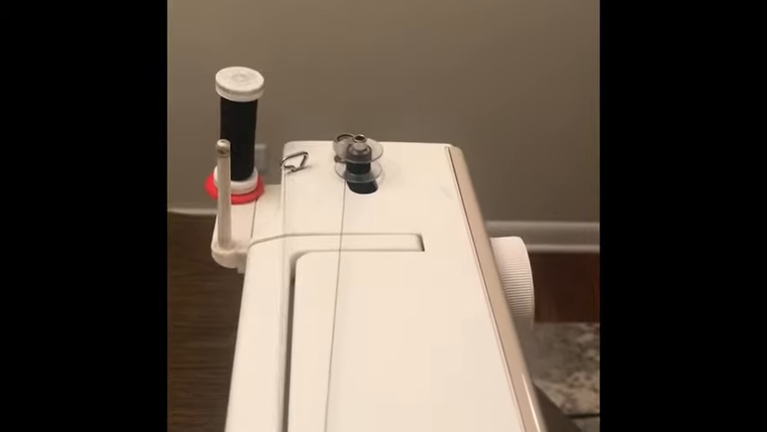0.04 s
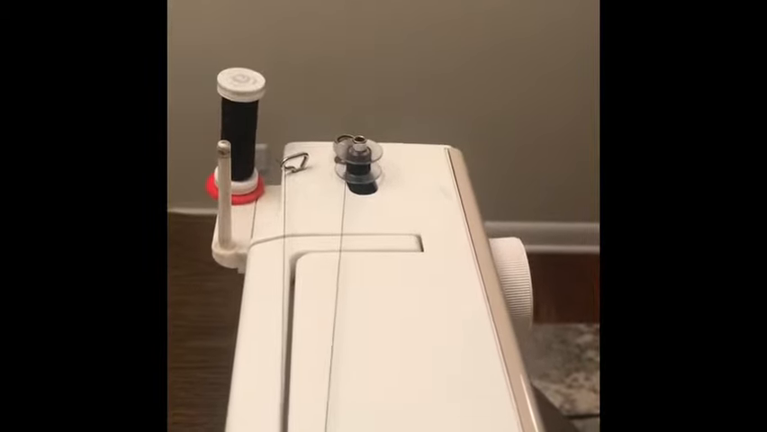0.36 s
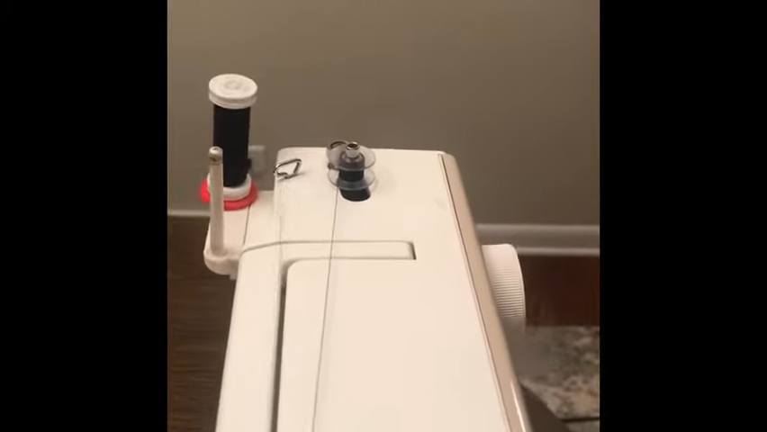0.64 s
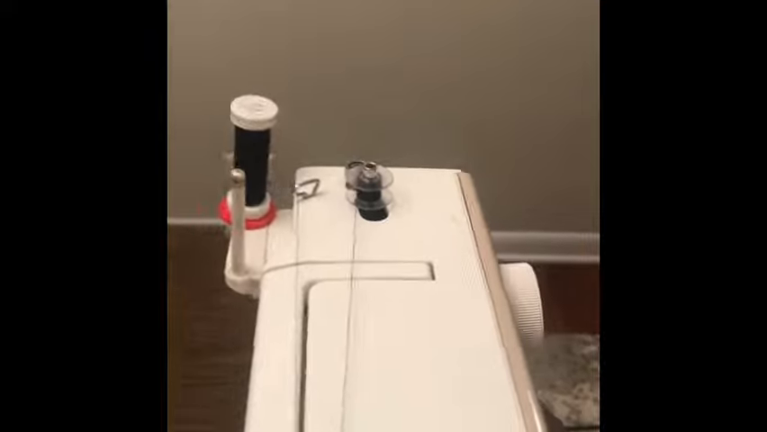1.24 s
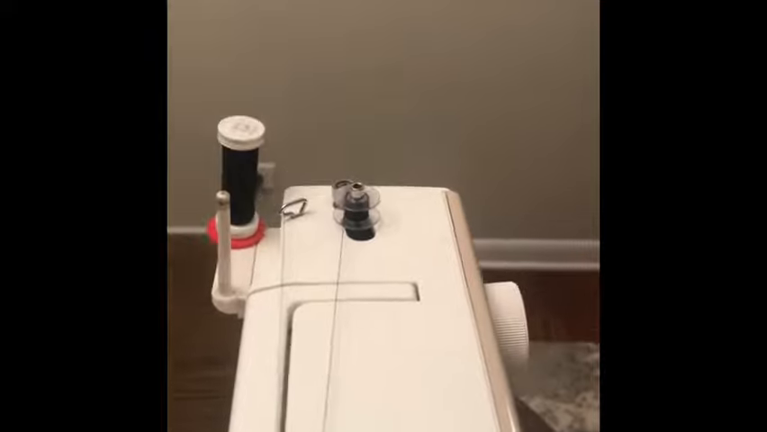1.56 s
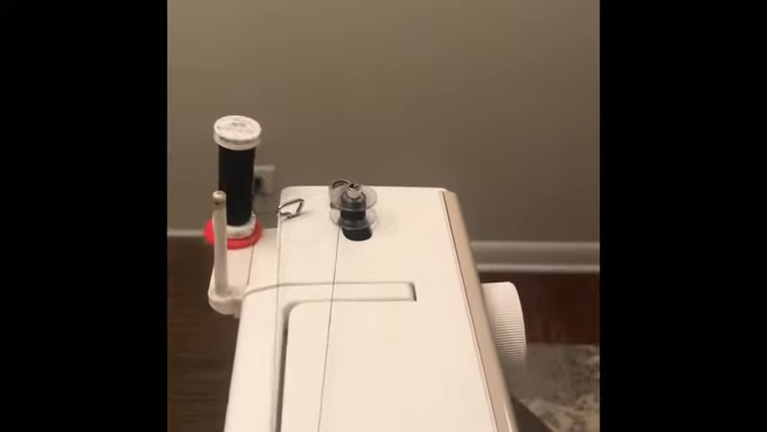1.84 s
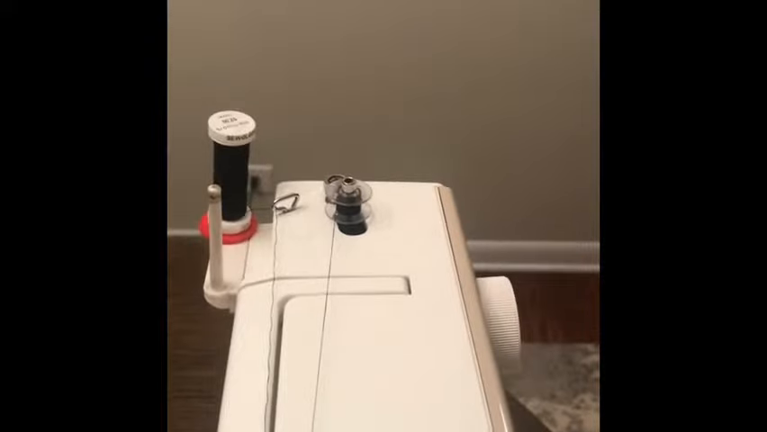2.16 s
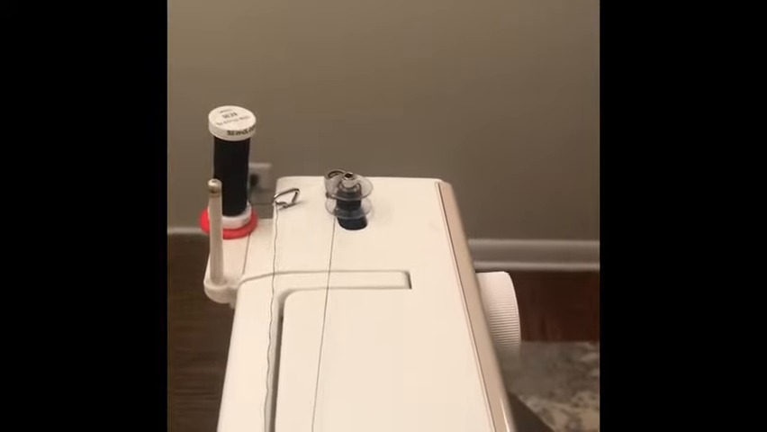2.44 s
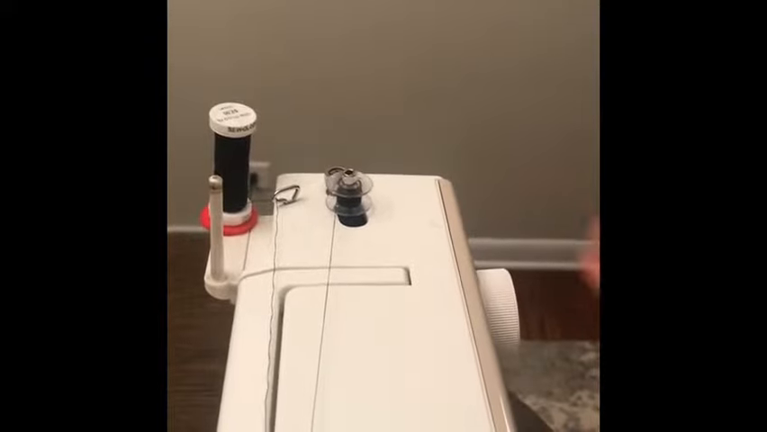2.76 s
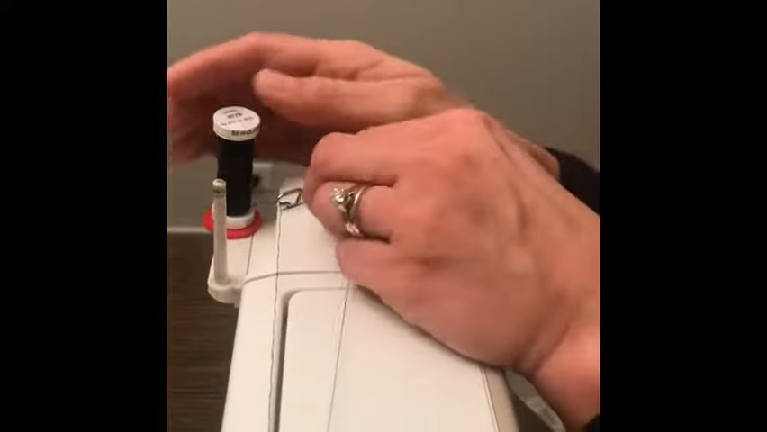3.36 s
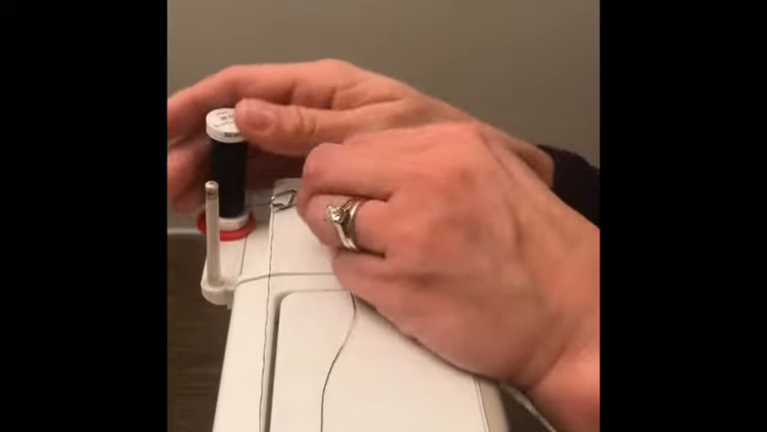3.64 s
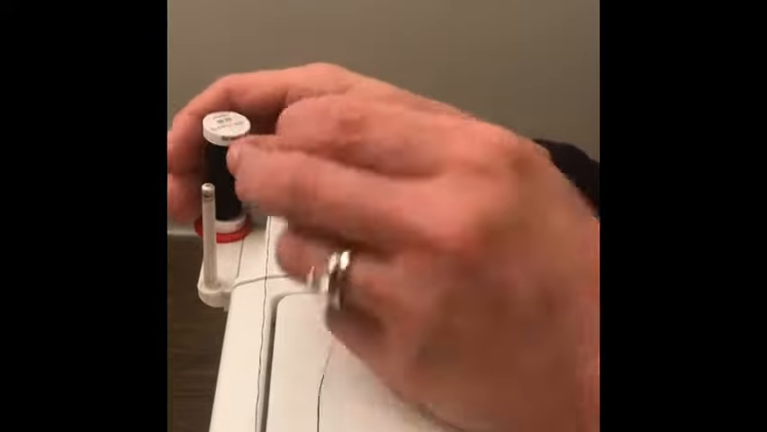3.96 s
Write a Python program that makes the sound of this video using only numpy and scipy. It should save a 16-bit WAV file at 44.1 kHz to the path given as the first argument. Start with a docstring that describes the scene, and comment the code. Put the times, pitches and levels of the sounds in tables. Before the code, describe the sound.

A sewing machine whirs and winds down, followed by light clicks and a sharp plastic snap.

```python
"""A domestic sewing machine winds a bobbin in a small room, over the low rumble of the house.
The drive whirs and rattles in its plastic casing, the motor hums, the thread rasps and ticks
and the spool chatters on its pin. By about 2 s it has run down, and the foot pedal clacks back.
Hands then reach in, brush the casing, snap the winder aside at 3.5 s and handle the bobbin
with light clicks. Last, the thread squeaks through the fingers."""
import sys
import numpy as np
from scipy import signal
from scipy.fft import rfft, irfft
from scipy.io import wavfile
from scipy.ndimage import uniform_filter1d

SR = 44100
rng = np.random.default_rng(int(sys.argv[2]) if len(sys.argv) > 2 else 0)


def generate_wav(signal):
    """Clip the signal to [-1, 1] and save it as 16-bit WAV at the path in sys.argv[1]."""
    frames = np.transpose(np.atleast_2d(signal))
    scaled = np.clip(frames, -1, 1) * 32767
    pcm = np.round(scaled).astype(np.int16)
    wavfile.write(sys.argv[1], SR, pcm)


N = 176400

# Reverb tail of the room. Each row: band centre in Hz, t60 in seconds, gain in dB.
ROOM_TAIL = [(260, 0.19, -0.5), (700, 0.42, -11), (1620, 0.33, -11.5), (3420, 0.38, -13.5),
             (7700, 0.41, -20.5), (14000, 0.2, -43)]
# EQ of the house rumble. Each row: frequency in Hz, gain in dB.
RUMBLE_EQ = [(20, -24), (66, 2.5), (95, -6), (170, -2.5), (310, -15), (400, -13), (850, -21.5), (1350, -28),
             (3000, -36.5), (8000, -45), (9000, -41), (10300, -46.5), (15500, -45.5)]

# The drive runs, then winds down. Each row: time in seconds, speed in turns per second.
DRIVE_SPEED = [(0, 38.3), (.3, 37.3), (.45, 36.8), (.8, 38.9), (1.03, 38.4), (1.22, 36.3), (1.36, 35.5),
               (1.56, 34.6), (1.7, 31.6), (1.85, 22.3), (2.05, 6.6)]
# Fader for whir, whine, hum and spool chatter. Each row: time in seconds, gain in dB.
DRIVE_FADER = [(0, 0.5), (.3, 0.5), (.5, -0.5), (.7, 0.5), (1.0, .5), (1.4, -1.5), (1.66, -2), (1.77, -5),
               (1.86, -13.5), (1.95, -18), (2.08, -36), (2.2, -90)]
# Resonances of the running machine. Each row: centre in Hz, width in Hz, gain in dB.
DRIVE_RESONANCES = [(369, 28, 0.5), (556, 57, -3), (610, 25, -8), (680, 7.9, 3), (772, 13, 1),
                    (1814, 98, 6), (1976, 49, 2), (2377, 29, 11.5), (6160, 460, -1)]
# EQ of the whir. Each row: frequency in Hz, gain in dB.
DRIVE_EQ = [(90, -18), (150, -9.5), (260, -20.5), (350, -2), (470, -5.5), (570, -1), (800, -2.5),
            (1020, 1.5), (1250, -9), (1800, -16), (2550, -15.5), (3700, -11), (5050, -28), (11400, -29),
            (15500, -36.5)]
# Tones of the shaft. Each row: multiple of the drive speed, pre-fader level in dB.
SHAFT_TONES = [(1, -60), (2, -44), (8, -56), (9, -57), (15, -56), (16, -65), (18, -53), (24, -52),
               (27, -58)]
# Fader for the shaft tones. Each row: time in seconds, gain in dB.
SHAFT_FADER = [(0, -1), (1.25, -3.5), (1.42, -2.5), (1.55, -30), (1.9, -42), (2.1, -92)]

# Fader for the thread's rasp and the bobbin's sizzle. Each row: time in seconds, gain in dB.
RASP_FADER = [(0, -60), (.55, -59.5), (.7, -56.5), (1.65, -61), (1.93, -72), (2.05, -90), (2.2, -120)]
# EQ of the thread dragging through its guide. Each row: frequency in Hz, gain in dB.
RASP_EQ = [(1500, -27), (4400, 6), (5100, -1), (6200, 3.5), (7800, -20), (12000, -15), (16000, -14)]
# Thin resonances of the spinning bobbin. Each row: centre in Hz, relative gain in dB.
BOBBIN_RESONANCES = [(7280, 3), (9275, 0.5), (10170, -4), (12100, 1), (13050, -4)]
# Ticks of thread on the bobbin. Each row: start in seconds, level in dB.
THREAD_TICKS = [(0.053, -48), (0.2727, -43), (0.3224, -47.5), (0.6457, -35), (0.795, -40), (0.9346, -42.5),
                (.972, -45.5), (1.1173, -44), (1.1485, -44), (1.305, -45), (1.4005, -46.5), (1.495, -39.5),
                (1.505, -48), (1.557, -47), (1.95, -59), (2.832, -63.5)]
# EQ of a tick. Each row: frequency in Hz, gain in dB.
TICK_EQ = [(1000, 1), (2500, -3), (4000, 6.5), (7000, -4.5), (12000, -4.5), (16000, -22)]
# The spool hits its pin. Each row: start in seconds, knock level in dB, tick level in dB.
SPOOL_KNOCKS = [(0.0937, -47, -44), (0.1122, -44, -37), (0.1139, -36, -43), (0.589, -39, -46),
                (0.72, -49, -50), (1.268, -41.5, -48), (1.325, -36.5, -43.5), (1.4147, -38, -43),
                (1.638, -43.5, -44.5)]

# EQ of the pedal clack. Each row: frequency in Hz, gain in dB.
PEDAL_EQ = [(300, -13), (850, -3), (1250, 7), (1600, 1), (2000, -5), (2550, -1), (3700, -5), (4400, -10.5),
            (8500, -18), (11000, -23), (16000, -30)]
# Skin rubbing on plastic. Each row: time in seconds, level in dB.
RUB_FADER = [(0, -120), (3.1, -99), (3.27, -66), (3.42, -65), (3.6, -62), (3.83, -57), (3.93, -63),
             (4, -66)]
# EQ of the rub. Each row: frequency in Hz, gain in dB.
RUB_EQ = [(200, -9), (400, 12), (1500, -2), (3000, -5.5), (6000, -5), (9000, -8), (11000, -10),
          (16000, -12)]
# Fingers and bobbin. Each row: start in seconds, then thud, body, mid, treble and fizz levels in dB.
BOBBIN_CLICKS = [(3.187, -45, -55, -63, -71, -64), (3.217, -45, -54, -57, -68, -68),
                 (3.302, -44.5, -38.5, -50.5, -75, -80), (3.3288, -72, -65, -56, -70, -65),
                 (3.345, -47, -40, -28.5, -30.5, -40), (3.48, -60, -42, -42, -47, -55),
                 (3.646, -50, -34.5, -30, -50, -58), (3.714, -52, -47, -46.5, -60, -61),
                 (3.8535, -46, -35, -40, -40, -34), (3.8585, -42, -36.5, -35, -55, -50),
                 (3.8634, -38, -28.5, -36, -47, -51)]
# EQ of a click's mid layer. Each row: frequency in Hz, gain in dB.
CLICK_MID_EQ = [(600, -18.5), (1100, -5.5), (1850, 4), (2500, -8.5), (3500, -3.5), (4500, -14), (5400, -19),
                (12000, -45)]
# Hits of the winder. Each row: start in seconds, crack level in dB, casing ring level in dB.
WINDER_SNAPS = [(3.5001, -13.5, -33), (3.5028, -15, -18), (3.513, -30, -27)]
# EQ of the crack. Each row: frequency in Hz, gain in dB.
SNAP_EQ = [(200, -35), (380, -22), (520, -1.5), (720, 9), (1400, 2), (1950, -1), (2450, -6.5), (3100, -2.5),
           (4500, -5), (5150, -6), (6000, -2), (7600, -12.5), (9000, -6.5), (10800, -15.5), (16000, -14)]
# Modes of the plastic casing. Each row: pitch in Hz, t60 in seconds, relative level in dB.
CASING_MODES = [(556, .06, -19), (719, 0.05, -8.5), (940, .05, -2), (1160, 0.09, -3), (1218, 0.084, 6.5),
                (1366, 0.11, -6), (1486, .09, -2), (1649, 0.049, -6), (1927, 0.055, -3)]

KNOCK_DECAY_S, CLICK_DECAY_S = 0.0069, 0.0032


def undb(db):
    """Decibels to gain."""
    return 10 ** (np.asarray(db) / 20)


def level(x, db=0):
    """Set the rms level."""
    return x * undb(db) / np.sqrt(np.mean(x ** 2) + 1e-30)


def clock():
    """Time of every sample in seconds."""
    return np.arange(N) / SR


def curve(rows):
    """Automation: straight lines between (seconds, value) points."""
    return np.interp(clock(), *np.array(rows, float).T)


def swell(peak_s, width_s):
    """A bell-shaped fade in and out."""
    return np.exp(-.5 * ((clock() - peak_s) / width_s) ** 2)


def noise():
    """White noise."""
    return rng.standard_normal(N)


def drift(rate_hz):
    """Smooth random modulation with a spread near 1."""
    hold = int(SR / rate_hz)
    steps = noise()[np.arange(N) // hold]
    return 1.3 * uniform_filter1d(uniform_filter1d(steps, hold), hold)


def band(x, lo_hz, hi_hz, order=2):
    """Band-pass filter."""
    sections = signal.butter(order, [lo_hz, hi_hz], "band", fs=SR, output="sos")
    return signal.sosfilt(sections, x + 1e-18)


def ring(x, hz, width_hz):
    """One resonance, gain 1 at its centre."""
    return signal.lfilter(*signal.iirpeak(hz, hz / width_hz, fs=SR), x + 1e-18)


def eq(x, points):
    """Minimum-phase EQ through (Hz, dB) points, so attacks stay crisp."""
    hz, db = np.array(points, float).T
    size = 4096
    log_hz = np.log(np.fft.rfftfreq(size, 1 / SR) + 1)
    cepstrum = irfft(np.log(undb(np.interp(log_hz, np.log(hz), db))))
    cepstrum[1:size // 2] *= 2
    cepstrum[size // 2 + 1:] = 0
    return signal.fftconvolve(x, irfft(np.exp(rfft(cepstrum))))[:len(x)]


def contact(decay_s, attack_s=0.00011):
    """A burst of micro-impacts, 60 ms long."""
    t = np.arange(int(.06 * SR)) / SR
    return rng.choice([-1, 1], len(t)) * (1 - np.exp(-t / attack_s)) * np.exp(-t / decay_s)


def add(out, at_s, burst, db):
    """Mix in a burst whose energy equals db held for 5 ms."""
    start = int(at_s * SR)
    burst = burst * undb(db) * np.sqrt(.005 * SR / np.sum(burst ** 2))
    out[start:start + len(burst)] += burst[:N - start]


def room(x, wet_db, early_s=0.014, early_db=-5):
    """Early reflections from table and wall, then a short, dark tail."""
    t = clock()[:SR // 2]
    early = rng.standard_normal(len(t)) * np.exp(-t / early_s)
    response = undb(early_db) * early * np.sqrt(2 / early_s / SR)
    for hz, t60, db in ROOM_TAIL:
        tail = band(rng.standard_normal(len(t)), hz / 1.5, hz * 1.5) * undb(-60 * t / t60)
        response += undb(db) * tail * np.sqrt(2 * np.log(1000) / t60 / SR)
    response *= np.minimum(t / 0.001, 1)
    return x + undb(wet_db) * signal.fftconvolve(x, response)[:N]


def house_rumble(fan_hz=143.9):
    """The bed: low rumble of the house with a faint, wavering fan hum."""
    fan = np.sin(2 * np.pi * fan_hz * clock() + 0.83 * drift(4.89)) * undb(4.5 * drift(3.11))
    rumble = band(eq(noise(), RUMBLE_EQ), 39, 20000)
    return level(rumble, -50.5) + level(fan, -60.5)


def rattle(turns, per_turn=36, slip_turns=0.0014, scatter_db=2.5):
    """Teeth and bearings strike at the same angles on every turn, never quite alike."""
    angles, strengths = rng.random(per_turn), rng.standard_normal(per_turn)
    laps = np.arange(80)[:, None]
    at_turns = laps + angles + slip_turns * rng.standard_normal((len(laps), per_turn))
    hits = strengths * undb(scatter_db * rng.standard_normal(at_turns.shape))
    return np.bincount(np.searchsorted(turns, at_turns.ravel()), hits.ravel(), N + 1)[:N]


def machine_body(x, db):
    """The casing resonates with what shakes it; db is its pre-fader level before the run-down."""
    resonance = sum(undb(gain_db) * ring(x, hz, width) for hz, width, gain_db in DRIVE_RESONANCES)
    voiced = eq(x + resonance, DRIVE_EQ)
    return voiced * undb(db) / np.std(voiced[clock() < 1.6])


def drive(hum_hz=120, whine_per_turn=20.85, belt_laps_per_turn=0.149):
    """Rattle and brush noise ring the casing; motor whine, mains hum and shaft tones lie beneath."""
    turns = np.cumsum(curve(DRIVE_SPEED) * (1 + .005 * drift(14))) / SR
    angle = 2 * np.pi * turns
    hum = np.sin(2 * np.pi * hum_hz * clock())
    brushes = noise() * (1 + 0.13 * hum) * (1 + 0.13 * np.sin(angle)) * undb(1.26 * drift(19.44))
    whir = machine_body(rattle(turns), -45) + machine_body(brushes, -41)
    whine = np.sin(whine_per_turn * angle + 1.1 * drift(45.2)) * undb(2 * drift(29.6))
    motor = whir + level(whine, -48) + level(hum, -51.5)
    shaft = np.zeros(N)
    for multiple, db in SHAFT_TONES:
        tone = np.sin(multiple * angle + 2 * np.pi * rng.random())
        shaft += level(tone * undb(2 * drift(9.74)), db)
    belt_throb = 1 + 0.22 * np.sin(belt_laps_per_turn * angle)
    return motor * undb(curve(DRIVE_FADER)) + shaft * belt_throb * undb(curve(SHAFT_FADER))


def thread(grains_per_s=1500):
    """The thread rasps through its guide, then sizzles and ticks as it lays itself on the bobbin."""
    fibres = noise() * (rng.random(N) < grains_per_s / SR) * undb(2.3 * drift(24.14))
    sizzle = sum(undb(db) * ring(noise(), hz, width_hz=220) for hz, db in BOBBIN_RESONANCES)
    sizzle *= undb(3 * drift(21.55))  # the treble flickers
    out = (level(eq(fibres, RASP_EQ)) + level(sizzle, -8)) * undb(curve(RASP_FADER))
    for at, db in THREAD_TICKS:
        add(out, at, eq(contact(decay_s=.0014), TICK_EQ), db)
    return out


def spool(jerks_per_s=22):
    """The spool chatters on its pin while the drive runs, with a harder knock now and then."""
    jerks = (rng.random(N) < jerks_per_s / SR) * undb(2 * noise())
    taps = signal.fftconvolve(jerks, contact(KNOCK_DECAY_S))[:N]
    out = level(ring(taps, hz=1850, width_hz=200), -56.5) * undb(curve(DRIVE_FADER))
    for at, knock_db, tick_db in SPOOL_KNOCKS:
        add(out, at, band(contact(KNOCK_DECAY_S), 670, 1880, order=3), knock_db)
        add(out, at, band(contact(CLICK_DECAY_S), 2760, 4050, order=3), tick_db)
    return out


def pedal(start_s=2.423, bounce_s=2.433, attack_s=0.00029, t60_s=0.27):
    """The pedal springs back under the table with a roomy clack and a bounce; a soft thump follows."""
    age = np.maximum(clock() - start_s, 0)
    envelope = (1 - np.exp(-age / attack_s)) * undb(-60 * age / t60_s)
    clack = level(eq(noise(), PEDAL_EQ), -42.5) * envelope
    add(clack, bounce_s, eq(contact(KNOCK_DECAY_S), PEDAL_EQ), db=-47)
    thump = level(band(noise(), 57, 100), -40.5) * swell(peak_s=2.59, width_s=0.032)
    return clack + thump


def hands():
    """Skin brushes the casing and the thread squeaks through the fingers."""
    rub = level(eq(noise(), RUB_EQ) * undb(2 * drift(30))) * undb(curve(RUB_FADER))
    squeak = level(band(noise(), 7650, 8550), -56) * swell(peak_s=3.993, width_s=0.011)
    return rub + squeak


def bobbin_clicks():
    """Small plastic parts touch: thin clicks layered over a soft thud of the casing."""
    out = np.zeros(N)
    for at, thud_db, body_db, mid_db, treble_db, fizz_db in BOBBIN_CLICKS:
        add(out, at, band(contact(decay_s=0.016), 330, 500), thud_db)
        add(out, at, band(contact(KNOCK_DECAY_S), 510, 1150, order=3), body_db)
        add(out, at, eq(contact(CLICK_DECAY_S), CLICK_MID_EQ), mid_db)
        add(out, at, band(contact(CLICK_DECAY_S), 4800, 6700, order=3), treble_db)
        add(out, at, band(contact(decay_s=0.0024), 7800, 12000), fizz_db)
    return out


def winder():
    """The winder springs aside, hits its stop and bounces: hard cracks that briefly ring the casing."""
    t = clock()[:SR // 4]
    casing = sum(undb(db - 60 * t / t60) * np.sin(2 * np.pi * hz * t) for hz, t60, db in CASING_MODES)
    out = np.zeros(N)
    for at, crack_db, ring_db in WINDER_SNAPS:
        add(out, at, eq(contact(decay_s=0.0014), SNAP_EQ), crack_db)
        add(out, at, band(casing, 400, 9000), ring_db)
    return out


def scene():
    """The mono mix, with thread, spool, clicks and winder sent to the room reverb."""
    winding = room(thread() + spool(), wet_db=0)
    clicks = room(bobbin_clicks(), wet_db=-4.5)
    snap = room(winder(), wet_db=-3.5)
    return (drive() + winding + pedal() + hands() + clicks + snap + house_rumble())[None]


def record(dry, cutoff_hz=15900):
    """A steep low-pass takes off the very top."""
    return signal.sosfilt(signal.ellip(10, .2, 80, cutoff_hz, fs=SR, output="sos"), dry)


dry = scene()
out = record(dry)
generate_wav(out)
```